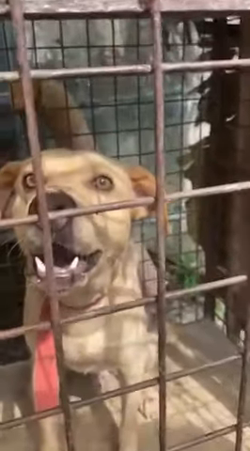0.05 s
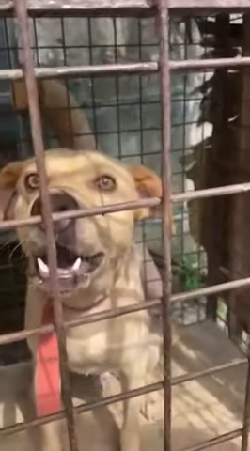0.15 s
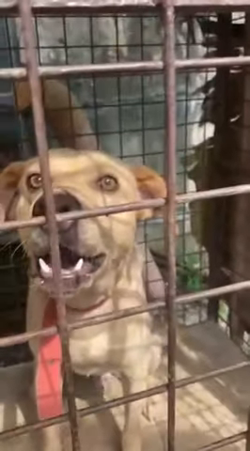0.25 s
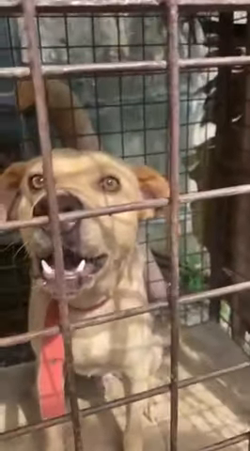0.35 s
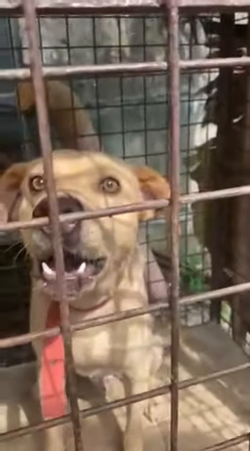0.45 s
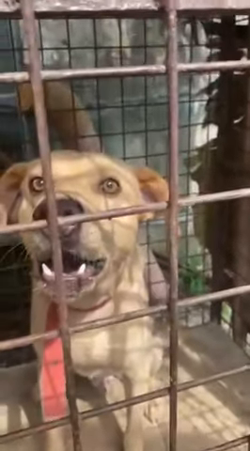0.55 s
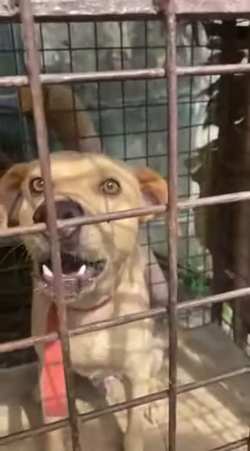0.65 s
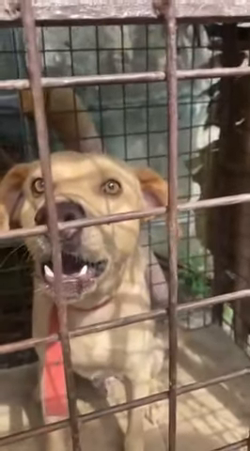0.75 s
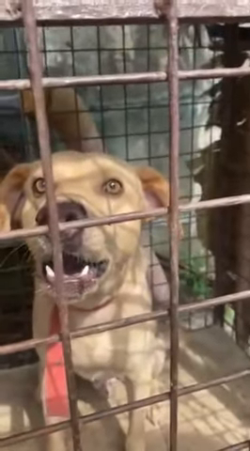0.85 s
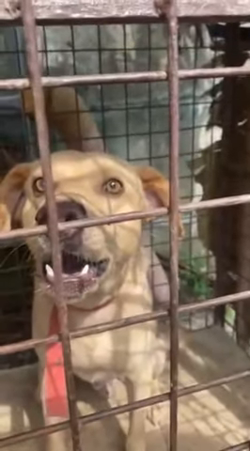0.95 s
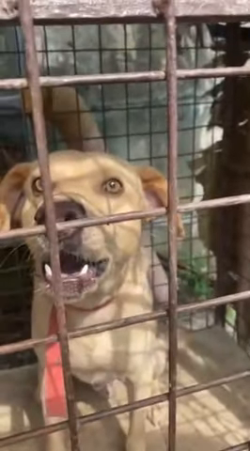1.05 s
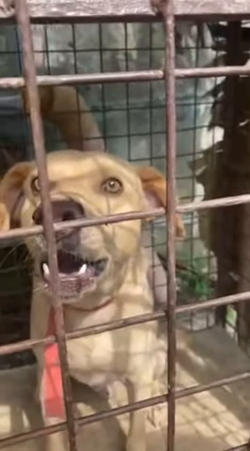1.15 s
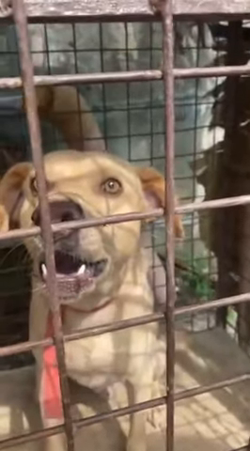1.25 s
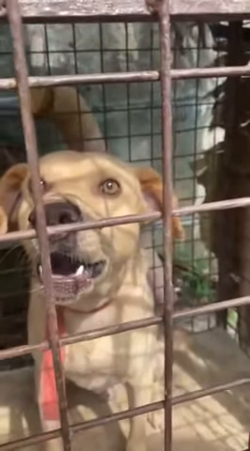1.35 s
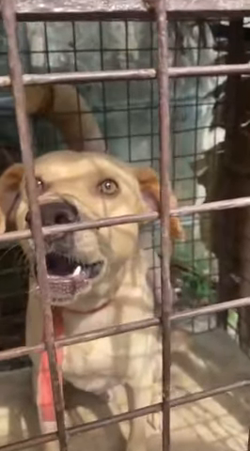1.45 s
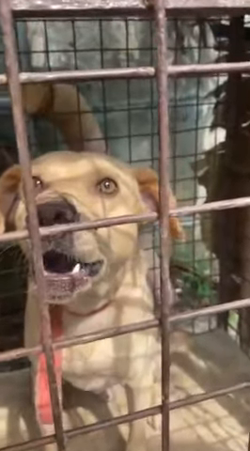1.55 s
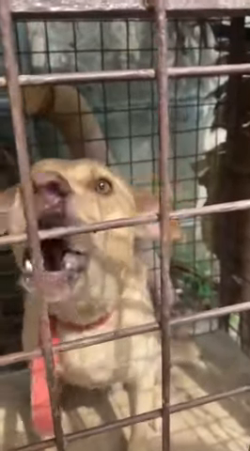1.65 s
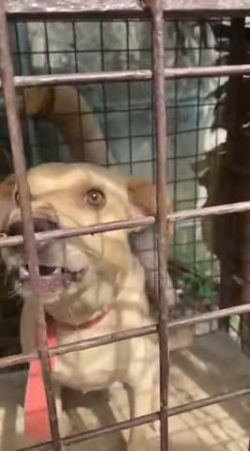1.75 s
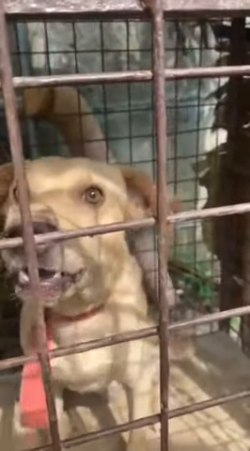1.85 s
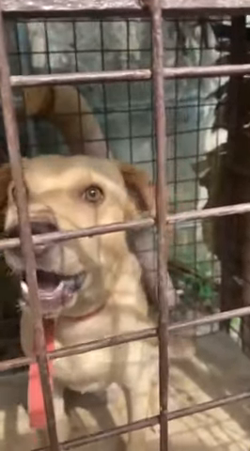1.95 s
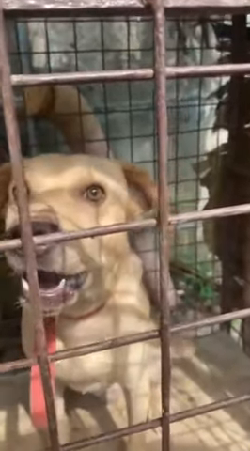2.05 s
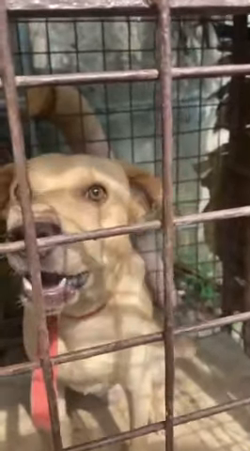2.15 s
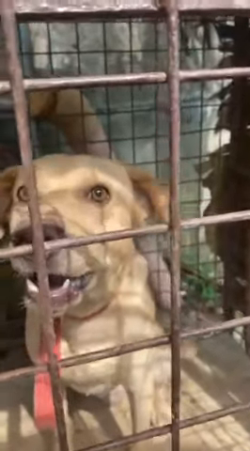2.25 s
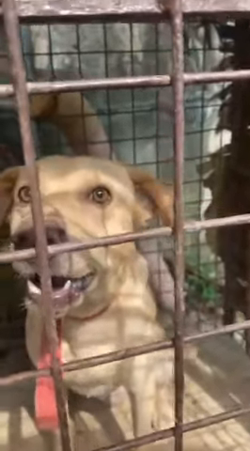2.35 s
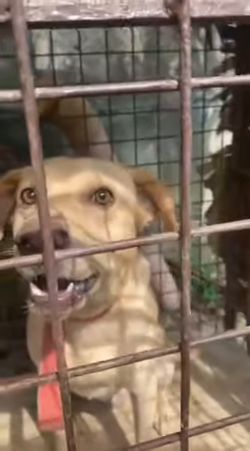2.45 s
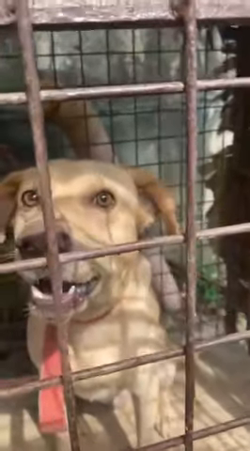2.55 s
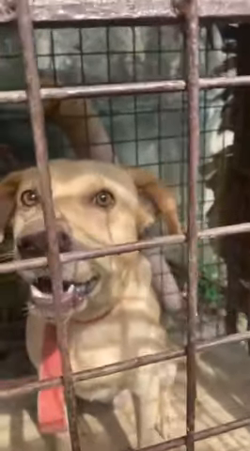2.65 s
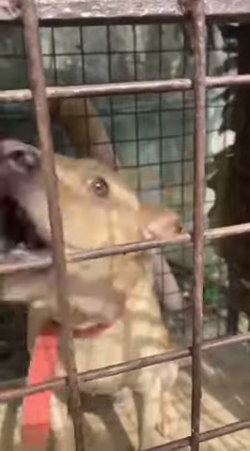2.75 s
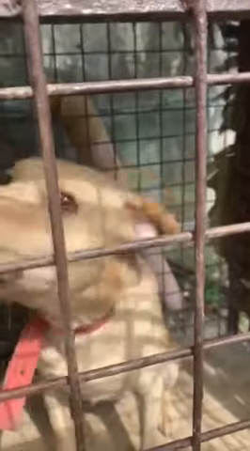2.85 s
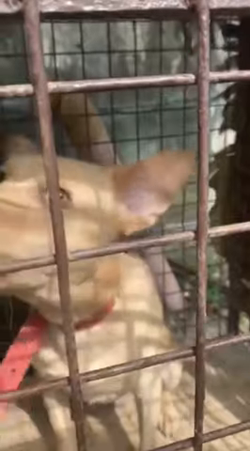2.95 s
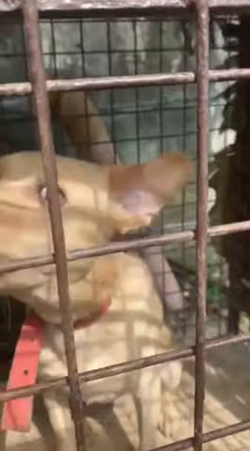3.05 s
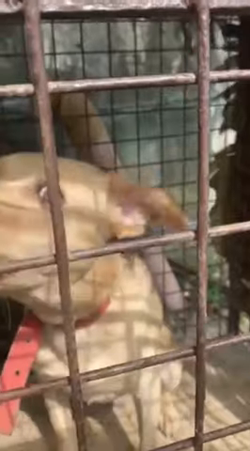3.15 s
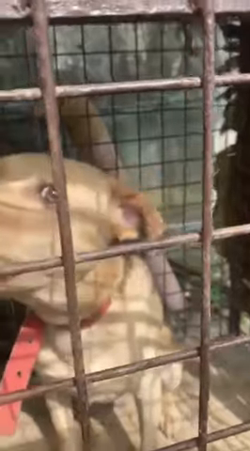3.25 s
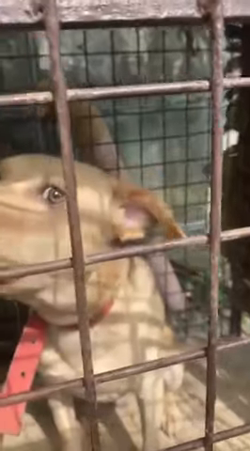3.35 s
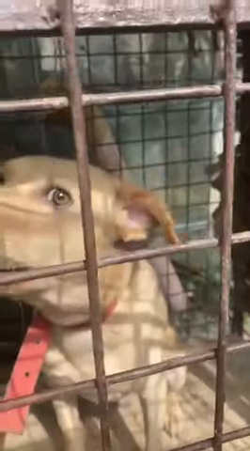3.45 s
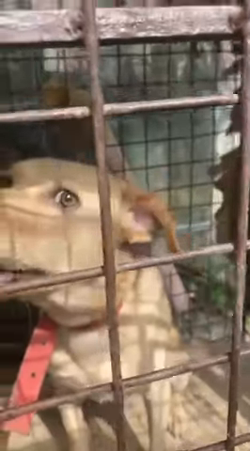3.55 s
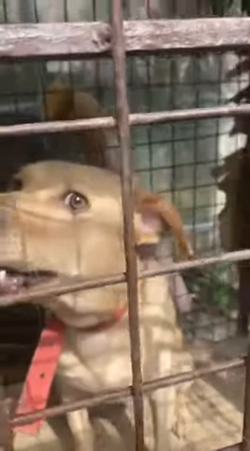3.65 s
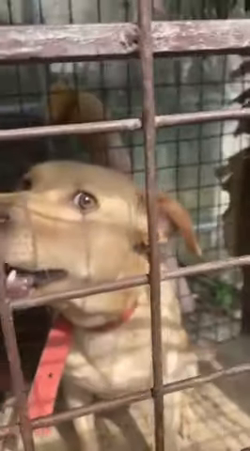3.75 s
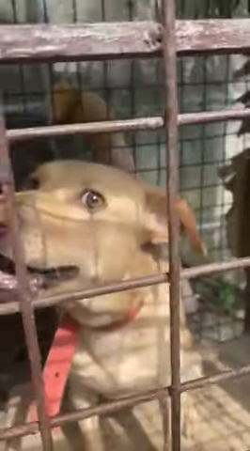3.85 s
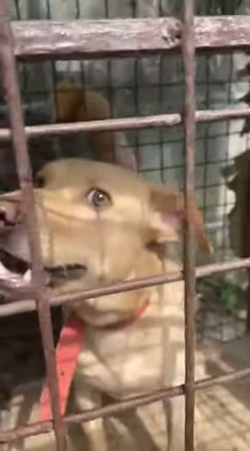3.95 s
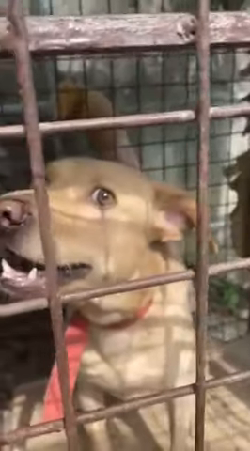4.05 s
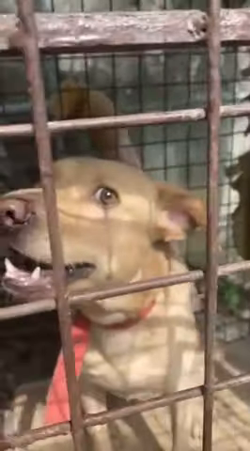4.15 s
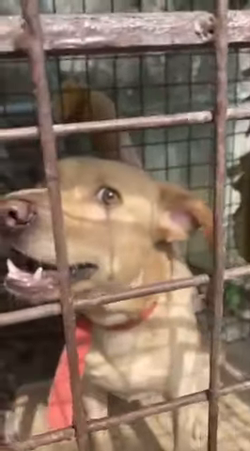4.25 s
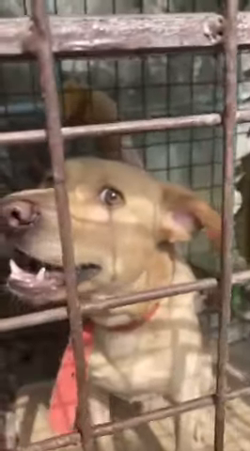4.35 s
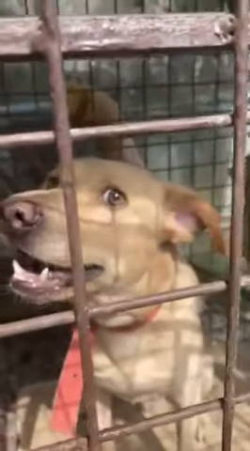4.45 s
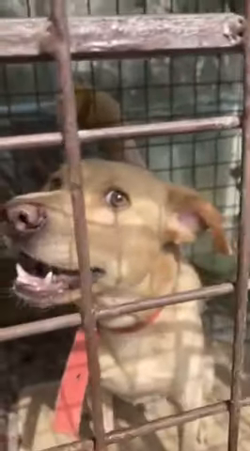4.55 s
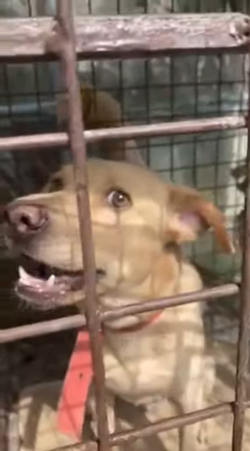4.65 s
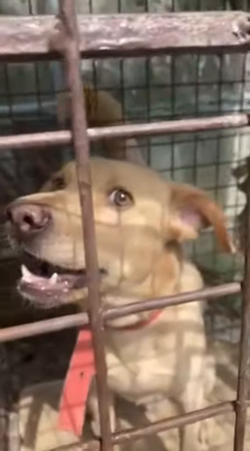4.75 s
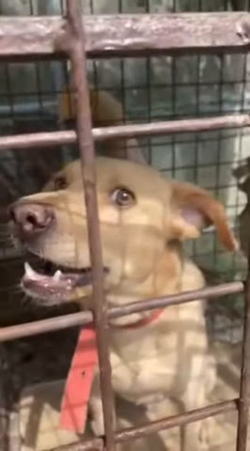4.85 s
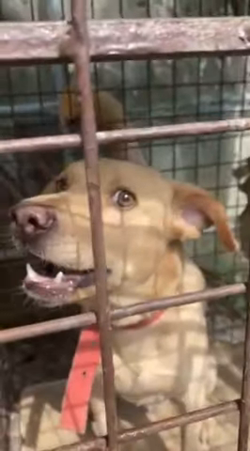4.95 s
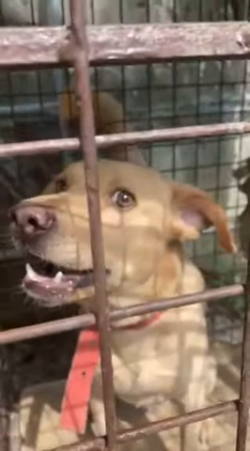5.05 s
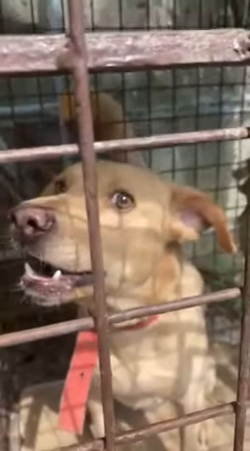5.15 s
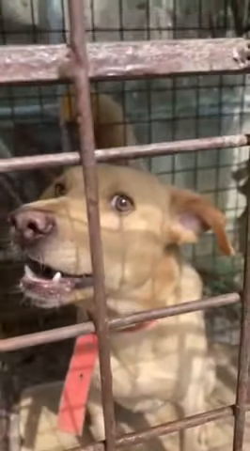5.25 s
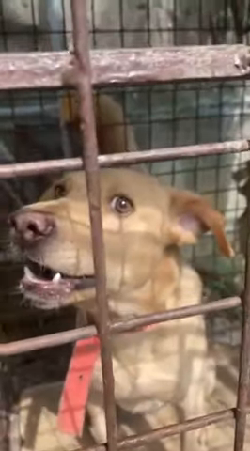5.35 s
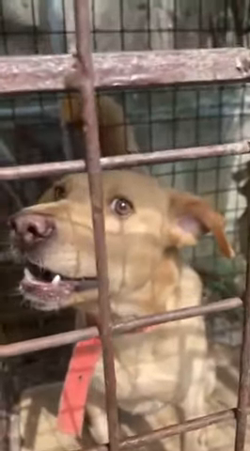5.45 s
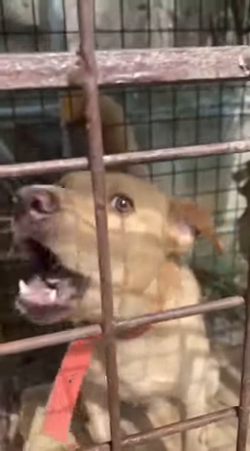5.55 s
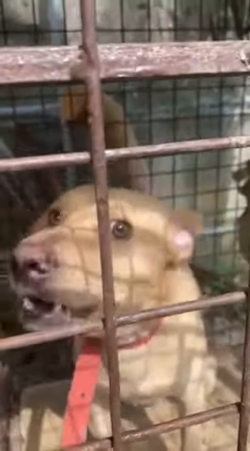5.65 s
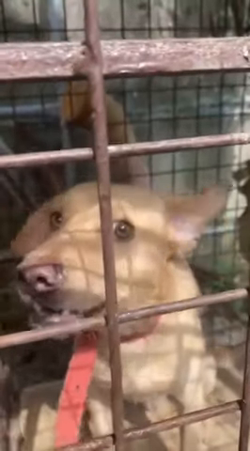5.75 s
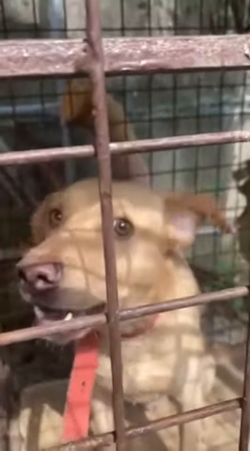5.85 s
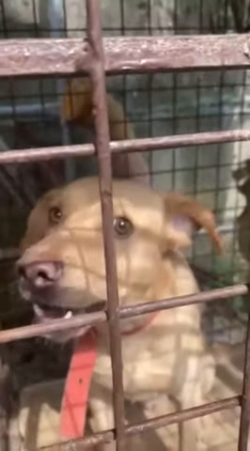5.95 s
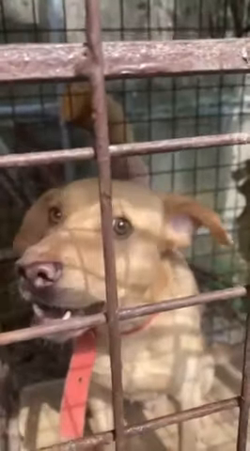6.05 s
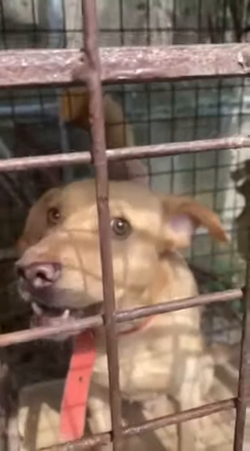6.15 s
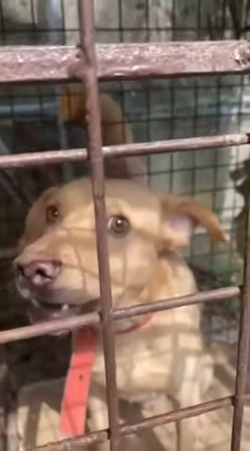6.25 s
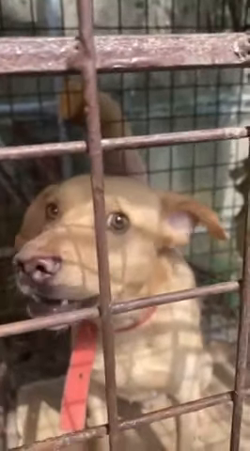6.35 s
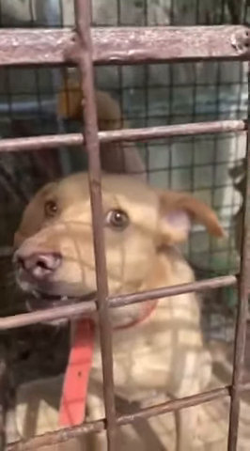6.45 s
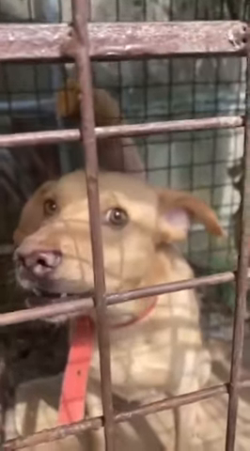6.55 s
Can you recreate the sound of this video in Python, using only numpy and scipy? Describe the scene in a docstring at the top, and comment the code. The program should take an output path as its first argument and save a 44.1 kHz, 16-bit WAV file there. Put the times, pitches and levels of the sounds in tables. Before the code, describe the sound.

Close phone pickup of a threatening dog: pulsing, gravelly growls through a nearly shut mouth, with small dry clicks and breathy hiss past the teeth. Three brief, explosive barks stand far above the growls, each yelping upward at its start and dying in a raspy tail. After the second bark a smoother low moan trails off. Faint outdoor rumble and a slight hard cage reflection surround it.

```python
"""A caged dog close to a phone growls in long breaths and barks three times.
Growl: uneven slow pulses of the vocal folds and puffs of air ring a nearly shut mouth, over a chest hum.
Bark: a high tone under a rough burst whose resonance sweeps up as the jaw drops, then a closing tone.
Single fold slaps click in the growl; air rasps as a bark dies. The cage reflects; outdoors rumbles faintly."""
import sys
import numpy as np
from scipy import signal
from scipy.fft import rfft, irfft, next_fast_len
from scipy.io import wavfile
from scipy.ndimage import uniform_filter1d, minimum_filter1d

SR = 44100
rng = np.random.default_rng(int(sys.argv[2]) if len(sys.argv) > 2 else 0)


def generate_wav(sig):
    """Save sig (samples, or channels by samples) to the path in sys.argv[1] as 16-bit PCM at SR."""
    pcm = np.round(np.clip(np.atleast_2d(sig).T, -1, 1) * 32767).astype(np.int16)
    wavfile.write(sys.argv[1], SR, pcm)


def gain_from_db(level_db):
    """Convert decibel levels to linear amplitude factors (20 dB per decade)."""
    decades = np.asarray(level_db, float) / 20
    return 10 ** decades


N = 291242  # length in samples

# outdoor rumble: frequency_hz, density_db
RUMBLE = [(12, -33), (25, -27.5), (50, -18.5), (85, 2), (125, -10), (165, 0), (250, -18), (400, -14.5),
          (750, -26.5), (1000, -21.5), (2400, -26), (3500, -42.5), (8000, -44), (12000, -64), (22000, -120)]
RUMBLE_DB = -63  # rms of the rumble
# deepest rumble, which comes and goes: time_s, level_db
DEEP_LEVEL = [(0.0, -65.5), (1.29, -67), (1.45, -92), (1.58, -52), (1.62, -59), (3.232, -67.5),
              (3.511, -77), (4.74, -76.5), (4.87, -59), (4.94, -72), (5.06, -58), (5.2, -67.5), (6.17, -61),
              (6.6, -77.5)]
# its band: low_edge_hz, high_edge_hz
DEEP_BAND = [35.2, 81.4]

# share sent back by the cage: frequency_hz, gain_db
CAGE_ECHO = [(100, -44), (300, -36.5), (600, -12), (1200, -16.5), (1800, -37.5), (2500, -4), (5000, 0),
             (11000, -6.5)]
# phase between the two microphone ports: frequency_hz, left_lead_radians
PORT_LEAD = [(0, 0), (2150, 0.0), (2500, 0.5), (3620, 0.1), (3960, 2.6), (4220, 2.6), (4820, 3.1),
             (5250, 5.8), (5510, 6.4), (6720, 6.4), (8180, 7.9), (8530, 8.6), (9220, 9.1), (11700, 9.5)]
# level between the ports: frequency_hz, left_over_right_db
PORT_TILT = [(60, 0), (130, 0), (270, -1.4), (570, -1.1), (1210, -.5), (2570, -.3), (5460, -.4),
             (11600, .2)]
CEILING, HOLD_S = 0.9, 0.0049  # limiter of the phone: full scale is 1; hold to each side of a peak

# air rasping high in the throat as a bark dies: start_s, length_s, level_db, from_hz, to_hz
RASPS = [(1.67, 0.0643, -49, 2657, 2990), (2.78, 0.024, -45, 2760, 2900), (5.64, .09, -51, 2760, 3500)]
# hardest single slaps of the folds in a growl: start_s, level_db
SLAPS = [(0.662, -26.5), (0.841, -23), (0.885, -28), (1.068, -21.5), (1.17, -26.5), (1.313, -27.5),
         (1.445, -25), (1.477, -29), (1.765, -31.5), (1.789, -39), (1.965, -26), (1.998, -27.5),
         (2.188, -34), (2.327, -26.5), (4.606, -41), (4.857, -39), (4.881, -37), (4.95, -35.5),
         (5.855, -36.5), (5.938, -36), (6.009, -27.5)]
STICK_S, STICK = 0.0044, 0.7  # the folds cling this long before a slap; share of the voice held back

# course of each bark: time_s, burst_db, yelp_db, closing_tone_db, slow_tone_hz, jaw_resonance_hz
BARKS = [
    [(1.553, -50.5, -52, -79, 514.3, 470), (1.562, -24, -41, -58.5, 514.7, 500),
     (1.571, -30.5, -8.5, -63, 498.3, 503), (1.576, -21, -7, -48, 541.3, 530),
     (1.582, -19, -8.5, -40.5, 551.5, 555), (1.587, -12.5, -11.5, -36.5, 565.6, 590),
     (1.592, -11.5, -25, -21, 562.5, 800), (1.6, -13, -14.5, -31.5, 584.2, 885),
     (1.607, -12.5, -29, -21, 587.5, 870), (1.616, -14, -20, -18, 581, 885),
     (1.626, -13, -15.5, -29, 596.7, 1030), (1.636, -9.5, -18.5, -14.5, 575.6, 965),
     (1.646, -16, -14, -21.5, 560, 972), (1.657, -19.5, -34.5, -7, 581, 960),
     (1.662, -16, -37, -10, 552, 930), (1.667, -22.5, -44, -26.5, 512, 900),
     (1.678, -22, -47, -10, 524, 850), (1.685, -28, -53, -22.5, 507, 850),
     (1.691, -31.5, -53, -33, 510, 880), (1.697, -37, -65, -17.5, 527, 900),
     (1.706, -45.5, -57.5, -28, 437, 900), (1.72, -52, -61, -42, 439, 950),
     (1.745, -74, -70, -72, 478, 750)],
    [(2.665, -56, -61, -67, 511, 520), (2.676, -36, -34, -72.5, 500, 540),
     (2.685, -33, -28, -63.5, 520, 495), (2.69, -28, -12, -59.5, 518, 508),
     (2.695, -26, -6.5, -55, 540, 545), (2.7, -25, -4.5, -45, 570, 572), (2.706, -23, -7, -40, 592, 596),
     (2.71, -21, -22.5, -13, 590, 770), (2.716, -13.5, -17, -21.5, 581.4, 860),
     (2.721, -13.5, -17.5, -32, 599.5, 920), (2.73, -11, -22, -21.5, 590.4, 880),
     (2.74, -8.5, -21, -31, 595.4, 1050), (2.752, -11.5, -18, -26, 598.5, 1130),
     (2.76, -12, -21.5, -17, 599.7, 950), (2.77, -17, -18, -15.5, 581.7, 1030),
     (2.783, -18, -25, -18.5, 544.2, 965), (2.8, -18.5, -33, -15.5, 548, 950),
     (2.813, -26.5, -52.5, -22, 583, 850), (2.822, -35, -48, -23, 461, 800),
     (2.836, -47, -57, -33.5, 493, 900), (2.865, -77.5, -73, -47, 501.7, 780)],
    [(5.49, -55, -61, -64.5, 518, 520), (5.498, -35, -38, -68.5, 502.4, 545),
     (5.507, -30, -31.5, -61.5, 519.2, 500), (5.513, -30.5, -12, -56, 543.6, 490),
     (5.519, -23, -20.5, -55, 540.7, 525), (5.525, -21, -11.5, -44.5, 560, 665),
     (5.531, -17.5, -23, -30, 560, 725), (5.538, -8, -28.5, -36, 563, 860),
     (5.546, -10.5, -17, -30.5, 575.2, 900), (5.56, -14.5, -22.5, -25, 584.2, 965),
     (5.568, -9, -20.5, -16, 563, 1000), (5.576, -10.5, -22.5, -12, 579.4, 990),
     (5.59, -14, -27, -17, 560.5, 970), (5.603, -19, -32, -12, 570.7, 1000),
     (5.615, -25, -43.5, -10, 516.5, 1020), (5.624, -35, -47.5, -15, 478, 1000),
     (5.635, -34.5, -42.5, -16, 520.5, 900), (5.648, -45, -56, -31, 458.4, 900),
     (5.66, -50.5, -64, -40, 500, 900), (5.678, -71.5, -80, -55, 490, 800)],
]
# how torn each bark is: raggedness (0-1)
RAGGED = [.95, .9, .8]
# throat in a bark, centred for a jaw resonance of 1000 Hz: centre_hz, width_hz, level_db
OPEN_THROAT = [(1250, 780, -2), (1720, 470, -10), (2140, 1200, -21), (2620, 200, -19.5), (3270, 900, -23.5)]
# air past the teeth in a bark: frequency_hz, density_db
BARK_HISS = [(2180, -38), (3700, -28.5), (4250, 2), (4930, -23.5), (5020, -16), (5560, -3.5), (7330, -1.5),
             (10900, -12), (11400, -14), (11600, -58.5), (15100, -99), (22000, -120)]
BARK_AIR_DB, AIR_SLOPE = -32, 0.74  # hiss under the burst, and how closely it follows (dB per dB)
# second to fourth partial of the yelp against the first: level_db
YELP_OVERTONES = [-13, -24, -26]
# second to fifth partial of the closing tone against the first: level_db
CLOSING_OVERTONES = [-15, -19, -31, -32]
HALF = 0.5  # depth at which every second slow beat chops the yelp
EDGE_HZ = 3240  # burst and tones carry almost nothing just above this

# stretches of growling: time_s, first_resonance_db, upper_throat_db, chest_hum_db
GROWLS = [
    [(0.0, -71, -68.5, -64.5), (0.046, -65, -76, -60), (0.142, -64.5, -74, -66), (0.202, -56, -67.5, -58),
     (0.222, -59, -70.5, -55), (0.246, -48, -68, -68), (0.268, -58, -61.5, -62), (0.282, -58, -95, -75.5),
     (0.312, -87.5, -90.5, -75), (0.358, -62, -68, -86.5), (0.392, -56, -67, -62), (0.422, -59, -74, -81),
     (0.46, -66, -83.5, -79.5)],
    [(0.46, -65, -69.5, -71), (0.5, -51, -53, -86), (0.524, -46, -51, -54), (0.554, -32.5, -42.5, -53.5),
     (0.618, -30, -43, -42.5), (0.86, -39.5, -45.5, -47), (0.89, -33, -43.5, -48), (0.944, -42, -51, -49),
     (0.97, -39, -46, -50.5), (1.404, -40.5, -49.5, -49.5), (1.494, -40, -48.5, -48.5),
     (1.528, -58, -81.5, -68), (1.54, -45, -54, -49.5), (1.558, -37.5, -49.5, -56.5)],
    [(1.885, -53, -52.5, -60), (1.901, -48, -57, -47.5), (1.975, -36, -39.5, -41.5), (2.005, -35, -44, -43),
     (2.219, -37.5, -47.5, -41.5), (2.235, -43, -48, -49.5), (2.345, -37, -49, -42.5),
     (2.495, -40, -50, -54.5), (2.525, -34.5, -43, -39), (2.579, -46.5, -53, -44.5),
     (2.625, -38.5, -56, -45.5), (2.653, -66.5, -77, -60), (2.66, -59, -74.5, -52.5)],
    [(2.835, -30, -52, -50), (2.853, -40, -52, -50), (2.866, -34, -56, -50), (2.885, -40, -58, -51),
     (2.909, -45, -57, -54), (2.937, -45, -56, -54), (2.977, -42, -53, -51.5), (3.031, -52, -56.5, -52),
     (3.195, -46.5, -56.5, -56), (3.427, -54.5, -60, -57), (3.633, -59, -64, -54),
     (3.753, -69.5, -74, -57.5), (3.79, -72.5, -70.5, -61.5)],
    [(4.48, -84, -77, -81.5), (4.495, -56, -58.5, -62.5), (4.6, -49, -60, -81.5), (4.634, -33.5, -43, -56),
     (4.72, -33, -43.5, -40), (4.816, -51.5, -50, -54.5), (4.868, -46, -55.5, -42.5),
     (4.9, -46.5, -54.5, -58.5), (4.972, -42.5, -49.5, -47.5), (5.13, -57, -61.5, -53.5),
     (5.456, -43, -53.5, -51.5), (5.48, -62.5, -65, -70.5), (5.487, -27, -53, -58)],
    [(5.8, -54.5, -73, -72), (5.82, -67, -60, -50), (5.846, -43, -57.5, -51.5),
     (5.864, -46.5, -46.5, -46.5), (6.05, -39, -47, -47.5), (6.09, -40.5, -50.5, -44),
     (6.204, -63.5, -58.5, -53), (6.238, -62, -64, -54.5), (6.288, -47, -60, -52.5),
     (6.402, -57.5, -64.5, -51.5), (6.474, -66, -71, -54.5), (6.552, -57, -58, -58), (6.6, -80.5, -79, -68)],
    [(1.705, -29, -41.5, -65), (1.729, -42.5, -55.5, -71), (1.741, -43.5, -49.5, -63),
     (1.801, -42, -50.5, -52.5), (1.849, -65, -77.5, -63.5), (1.87, -54, -80.5, -73)],
    [(5.655, -31.5, -40, -71), (5.699, -53, -47, -52), (5.749, -42.5, -59.5, -62.5),
     (5.765, -54.5, -60.5, -74.5), (5.779, -66, -89.5, -76.5), (5.8, -57, -80.5, -75.5)],
    [(3.79, -72, -68, -62), (3.846, -58, -63.5, -55.5), (3.93, -56, -60, -54.5), (4.1, -61.5, -65, -55.5),
     (4.26, -65.5, -69.5, -58), (4.32, -75, -70.5, -69), (4.41, -81, -83.5, -63), (4.47, -91, -97, -72)],
]
# pulse rate of the growling folds: time_s, pitch_hz
PITCH = [(0.0, 85.23), (.12, 84.75), (.19, 78.39), (.28, 73.17), (.42, 84.03), (0.5, 164.8), (0.57, 151.2),
         (0.68, 150), (0.8, 157.8), (0.88, 163.1), (0.93, 122), (1.89, 112.3), (1.97, 142.9), (2.19, 133.6),
         (2.35, 145.3), (2.6, 131.8), (2.8, 304), (2.85, 280.2), (2.9, 227.4), (2.945, 192.4),
         (3.02, 183.7), (3.08, 162.6), (3.1, 118.4), (3.31, 116.4), (3.36, 114.4), (3.51, 110.1),
         (3.64, 102.4), (3.78, 88.55), (3.81, 95.24), (3.86, 106), (3.9, 102.8), (3.97, 112.6),
         (4.05, 97.96), (4.09, 94.3), (4.14, 100.9), (4.2, 94), (4.3, 89.05), (4.41, 82.6), (4.5, 92.61),
         (4.63, 158.5), (4.93, 140.5), (5.3, 136.7), (5.46, 115.6), (6.09, 133.7), (6.3, 114.2),
         (6.4, 90.5), (6.48, 83.1), (6.53, 128.7), (6.6, 130.9)]
# how unevenly the folds beat: time_s, roughness (0-1)
ROUGH = [(0, .2), (.15, .2), (.22, .3), (.3, .35), (.52, .5), (.57, .1), (.74, .1), (.78, .25), (.86, .3),
         (.92, .7), (1.95, .8), (2.02, .48), (2.15, .55), (2.22, .8), (2.8, .8), (2.86, .15), (3.05, .25),
         (3.15, .4), (3.35, .28), (3.48, .05), (4.42, .05), (4.5, .7), (4.65, .38), (4.78, .42),
         (4.85, .75), (6.35, .75), (6.42, .15), (6.52, .2), (6.6, .6)]
# loose tissue flaps and chops the growl: time_s, depth_db
RATTLE = [(0, 1), (.8, 2.5), (.95, 1), (2.6, 1), (2.88, 3), (3.35, 3.5), (3.5, 1), (4.4, 1), (4.85, 1.5),
          (6.6, 3)]
# first resonance as the lips move: time_s, centre_hz
MOUTH = [(0, 560), (.25, 710), (.5, 597), (.72, 562), (.95, 579.6), (1.45, 595), (1.8, 642), (2.0, 638),
         (2.22, 549.4), (2.6, 582.4), (2.86, 560), (2.92, 465), (3.7, 510), (3.82, 690), (4.25, 724),
         (4.65, 780), (4.99, 640), (5.7, 556.5), (5.86, 656), (6.16, 525), (6.6, 473)]
REST_HZ = 560  # first resonance with the lips at rest
# throat in a growl: centre_hz, width_hz, level_db
UPPER = [(1240, 530, -12.5), (1434, 140, -4), (1785, 540, -30.5), (2377, 300, -6), (2440, 130, -8.5),
         (3120, 440, -12), (4010, 250, -14), (1500, 71, -14.5)]
# shift of each upper resonance per Hz of the first: shift_hz_per_hz
FOLLOW = [0.252, 0.8, 0.083, 0.175, 0.78, 0.19, 0.089, 0.76]
SECOND_DB, HIGHER_DB = 0, -3.5  # how the two groups of upper resonances share their level
# soft moan through the nose: time_s, nasal_share (0-1)
NASAL = [(2.7, 0), (2.9, 1), (4.4, 0.92), (4.6, 0.25), (4.9, 0.47)]
# what the nose does to each upper resonance: change_db
NASAL_CHANGE = [-3, -10, 17, 2, -4, -6, -7, 0]
# its effect on the second group (dB), the sinking of a low resonance and the broadening of the upper ones
NASAL_SECOND_DB, NASAL_DROP, NASAL_WIDEN = -2.5, 0.13, 0.2
# jaw still open for a moment after a bark: time_s, open_share (0-1)
JAW = [(1.5, 0), (1.6, 0.83), (1.8, 0.6), (1.88, 0.23), (2.7, 0), (2.8, .6), (2.9, .4), (3.0, 0),
       (5.5, 0.11), (5.6, 1), (5.76, 0.9), (5.82, 0.27)]
# throat then: centre_hz, width_hz, level_db
AJAR = [(1150, 400, -1.5), (1680, 180, 4), (2300, 450, 0), (2950, 500, -8.5), (3550, 400, -15)]
# side pockets of the mouth swallow narrow bands: centre_hz, width_hz, gain_db
POCKETS = [(900, 75, -5), (1920, 260, -6)]
# air past the teeth in a growl: frequency_hz, density_db
GROWL_HISS = [(2880, -35.5), (4900, 6), (5150, -3.5), (6440, -6.5), (6930, -8), (7360, -6.5), (8630, -7),
              (9080, -5), (11600, -19), (15100, -56.5), (22000, -120)]
# hiss over the upper throat; the soft moan carries little air: time_s, level_db
AIR = [(0, -13), (.4, -11.5), (1.5, -8.5), (2.6, -7.5), (2.9, -21), (4.4, -19), (4.55, -9), (6.6, -9.5)]
# how much of the chest hum is a clear tone: time_s, clear_share (0-1)
CLEAR = [(0, .9), (.22, .9), (.3, .5), (.5, .5), (.54, .92), (.8, .9), (.88, .75), (.94, .3), (1.95, .2),
         (2.02, .65), (2.15, .55), (2.22, .25), (2.5, .25), (2.55, .6), (2.65, .3), (2.84, .95), (3.05, .9),
         (3.12, .7), (3.3, .85), (3.48, .97), (4.42, .97), (4.5, .3), (4.65, .85), (4.78, .8), (4.85, .25),
         (6.33, .25), (6.42, .9), (6.48, .9), (6.52, .3), (6.6, .3)]
# second partial of the chest hum against the first: time_s, level_db
OCTAVE = [(0, 1), (.3, 7), (.45, -17), (.6, -6.5), (2.8, -1.5), (3.2, -13.5), (3.75, -14.5), (4.1, -15.5),
          (4.4, 0), (4.6, -3), (6.6, -8.5)]


def evened(x):
    """Scales x to rms 1."""
    return x / np.sqrt(np.mean(x ** 2) + 1e-20)


def steady(x, width=2200):
    """Evens the slow level of x to 1, over width samples."""
    return x / np.sqrt(abs(uniform_filter1d(x ** 2, int(width))) + 1e-12)


def curve(points, at):
    """Straight lines through the points of a table."""
    return np.interp(at, *np.transpose(points))


def read(points, hz):
    """Reads a table on a logarithmic frequency axis."""
    f, value = np.transpose(points)
    return np.interp(np.log(hz + 1), np.log(f + 1), value)


def coloured(x, gain):
    """Filters by a gain that is a function of frequency."""
    size = next_fast_len(x.shape[-1])
    spectrum = rfft(x, size) * gain(np.fft.rfftfreq(size, 1 / SR))
    return irfft(spectrum, size)[..., :x.shape[-1]]


def band(x, order, edges_hz, kind):
    """A steep causal filter."""
    return signal.sosfilt(signal.butter(order, edges_hz, kind, fs=SR, output="sos"), x)


def resonate(x, hz, width):
    """Shifts the curve hz down to zero, smooths, and shifts back: a resonance of gain 1."""
    turn = np.exp(2j * np.pi * np.cumsum(hz * np.ones(len(x))) / SR)
    r = np.exp(-np.pi * width / SR)
    return 2 * (turn * signal.lfilter([1 - r], [1, -r], x / turn)).real


def wobble(count, hz):
    """Slow chance of rms 1 that changes about hz times a second."""
    return evened(resonate(resonate(rng.standard_normal(count), 0, hz), 0, hz))


def throat_ring(x, hz, width):
    """A steep resonance of soft tissue that never holds still."""
    hz = hz * (1 + 0.013 * wobble(len(x), 12))
    return resonate(resonate(x, hz, width), hz, 2 * width)


def voiced(hz, overtones_db):
    """A tone on the curve hz with a few overtones; the lowest partial has rms 1."""
    turn = 2 * np.pi * np.cumsum(hz) / SR
    return np.sqrt(2) * sum(gain_from_db(db) * np.sin((k + 1) * turn) for k, db in enumerate([0] + overtones_db))


def folds(hz, rough, jitter, shimmer_db):
    """One pulse a cycle, late or early and strong or weak by chance; returns pulses and airflow gate."""
    turns = np.cumsum(hz * np.exp(jitter * rough * wobble(len(hz), hz.mean()))) / SR
    cycle = turns.astype(int)
    size = gain_from_db(shimmer_db * rough * rng.standard_normal(len(hz))[cycle])
    phase = turns - cycle
    pulses = np.diff(size * phase ** 2, prepend=0)  # flow swells, then shuts at once
    gate = size * (0.25 + np.exp(-phase / 0.3))
    return pulses, gate


def hiss(gate, colour):
    """Air past the teeth, puffed by the folds."""
    puffed = gate * rng.standard_normal(len(gate))
    return steady(coloured(puffed, lambda hz: gain_from_db(read(colour, hz))))


def deep():
    """Noise at the very bottom, the same at both ports."""
    low = band(rng.standard_normal(N), order=2, edges_hz=DEEP_BAND, kind="band")
    return gain_from_db(curve(DEEP_LEVEL, np.arange(N) / SR)) * evened(low)


def rumble():
    """Lumpy low outdoor noise, nearly alike at both ports."""
    near, apart = rng.standard_normal((2, N)) * gain_from_db(0.83 * wobble(N, 2.1))
    both = np.array([near + 0.06 * apart, near - 0.06 * apart])
    return gain_from_db(RUMBLE_DB) * evened(coloured(both, lambda hz: gain_from_db(read(RUMBLE, hz))))


def cage(x, t60=0.16):
    """Sparse reflections of random sign from bars, floor and walls, other ones at each port."""
    taps = np.zeros((2, SR // 2))
    at = np.arange(60, SR // 2 - 22, 22)
    at = at + rng.integers(0, 22, (2, len(at)))  # one reflection somewhere in every 22 samples
    bounce = rng.choice([-1., 1.], at.shape) * gain_from_db(-60 * at / SR / t60)
    np.put_along_axis(taps, at, bounce, 1)
    return signal.fftconvolve(x[None], taps / np.linalg.norm(taps[0]), axes=1)[:, :N]


def rasp(s, length, db, from_hz, to_hz):
    """Fluttering noise in one resonance that climbs."""
    hz = np.linspace(from_hz, to_hz, int(length * SR))
    air = rng.standard_normal(len(hz)) * gain_from_db(3.0 * wobble(len(hz), 90))
    ring = resonate(resonate(air, hz, 450), hz, 700)
    return s, gain_from_db(db) * evened(ring) * np.hanning(len(hz))


def slap(s, db):
    """One click rings the first resonance and the upper throat for a few milliseconds."""
    t = np.arange(SR // 30) / SR
    first = np.sin(2 * np.pi * curve(MOUTH, s) * t) * np.exp(-t / 0.0041) * (1 - np.exp(-t / 0.00055))
    upper = sum(gain_from_db(level) * np.sin(2 * np.pi * f * t) * np.exp(-np.pi * w * t) for f, w, level in UPPER)
    return s, gain_from_db(db) * (first + 0.3 * upper)


def bark_burst(slow, fast, gate, mouth_hz):
    """Both vibrations and torn air ring the jaw and throat; the loudest swings of air saturate."""
    air = gate * rng.standard_normal(len(gate))
    drive = evened(fast) + 0.8 * evened(slow) + 0.5 * evened(air)
    throat = resonate(resonate(drive, mouth_hz, 540), mouth_hz, 890)
    spread = (mouth_hz / 1000) ** 0.4  # the upper throat follows the jaw a little
    for f, w, db in OPEN_THROAT:
        throat = throat + gain_from_db(db) * resonate(resonate(drive, f * spread, w), f * spread, 2.5 * w)
    throat = np.tanh(0.45 * steady(throat, 900))
    return steady(band(throat, order=3, edges_hz=330, kind="high"), 1500)


def bark(rows, ragged):
    """Two vibrations at once: a wavering low tone, and a ragged faster one that glides up as the jaw drops."""
    s, *columns = np.transpose(rows)
    t = np.arange(s[0], s[-1], 1 / SR)
    burst_db, yelp_db, closing_db, hz, mouth_hz = (np.interp(t, s, c) for c in columns)
    slow, gate = folds(hz, ragged, jitter=0.045, shimmer_db=4)
    fast, _ = folds(mouth_hz, 0.5 + 0.5 * ragged, jitter=0.045, shimmer_db=6)
    burst = bark_burst(slow, fast, gate, mouth_hz)

    # both tones break up once the fast vibration leaves the slow one
    clash = ragged * np.clip((mouth_hz / hz - 1.2) / 0.5, 0.05, 1)
    closing = voiced(hz * (1 + 0.024 * clash * wobble(len(t), 120)), CLOSING_OVERTONES)
    closing = closing * gain_from_db(2.8 * clash * wobble(len(t), 70))
    yelp = voiced(mouth_hz * (1 + (0.006 + 0.03 * clash) * wobble(len(t), 100)), YELP_OVERTONES)
    yelp = yelp * gain_from_db(2.5 * clash * wobble(len(t), 110))
    yelp = yelp * (1 + HALF * clash * np.sin(np.pi * np.cumsum(hz) / SR))  # at half the slow rate

    voice = gain_from_db(yelp_db) * yelp + gain_from_db(closing_db) * closing
    voice = voice + gain_from_db(burst_db + 0.82 * wobble(len(t), 80)) * burst
    for _ in range(2):
        voice = band(voice, order=14, edges_hz=EDGE_HZ, kind="low")
    voice = voice + gain_from_db(BARK_AIR_DB + AIR_SLOPE * burst_db) * hiss(gate, BARK_HISS)
    voice = band(voice, order=4, edges_hz=160, kind="high")  # a small head radiates no bass
    return s[0], voice * signal.windows.tukey(len(t), 0.05)


def chest_hum(low, t):
    """The chest hums the two lowest partials, between a clear tone and a rough resonance."""
    clear = curve(CLEAR, t)
    turns = np.cumsum(curve(PITCH, t) * (1 + 0.1 * (1 - clear) * wobble(len(t), 40))) / SR
    tone = np.sin(2 * np.pi * turns) + gain_from_db(curve(OCTAVE, t)) * np.sin(4 * np.pi * turns)
    tone = tone * gain_from_db(1.5 * wobble(len(t), 19))
    rough = resonate(resonate(low, 210, 240), 130, 390)
    rough = rough + 0.38 * resonate(resonate(low, 145, 77), 145, 140)
    chest = clear * tone + (1 - clear) * steady(rough)
    return steady(band(chest, order=4, edges_hz=65, kind="high"), 4000)


def first_resonance(low, first_hz, nasal):
    """A split resonance of the mouth: the moving centre leans on the lower or the upper of a fixed pair."""
    share = np.clip((first_hz - 500) / 220, 0, 1)
    first = 0.78 * (1 - nasal) * resonate(low, first_hz, 110)
    lower_gain = 1.1 - 0.72 * share * (1 - 0.42 * nasal)
    first = first + lower_gain * resonate(low, 580 * (1 - NASAL_DROP * nasal), 120)
    first = first + (0.34 + 2.2 * share) * resonate(low, 702.6, 53)
    first = first + 0.58 * resonate(low, 200, 170)
    first = band(first, order=5, edges_hz=582, kind="low")  # little is left just above
    return steady(band(first, order=2, edges_hz=454, kind="high"), 4800)


def upper_throat(pulses, gate, t, rough, nasal, upper_db):
    """Pulses and turbulence, new at every narrowing, ring the upper throat; an open jaw changes its shape."""
    airs = [steady(gate * rng.standard_normal(len(t))) for _ in UPPER]
    moved = curve(MOUTH, t) - REST_HZ
    widen = 1 + NASAL_WIDEN * nasal.mean()  # soft walls of the nose
    rings = []
    for (hz, width, db), change, step, air in zip(UPPER, NASAL_CHANGE, FOLLOW, airs):
        high = pulses + (0.9 - 0.35 * nasal + 1.7 * rough) * air  # turbulence rules the treble
        rings.append(gain_from_db(db + nasal * change) * throat_ring(high, hz + step * moved, width * widen))
    second = gain_from_db(SECOND_DB + nasal * NASAL_SECOND_DB) * steady(sum(rings[:3]) + rings[-1], 5300)
    higher = gain_from_db(HIGHER_DB) * steady(sum(rings[3:-1]), 5300)
    shut = gain_from_db(upper_db) * (second + higher)

    ajar = sum(gain_from_db(db) * throat_ring(air, hz, width) for (hz, width, db), air in zip(AJAR, airs))
    ajar = gain_from_db(upper_db + 1.5 * wobble(len(t), 60)) * steady(ajar, 1800)
    jaw = curve(JAW, t)
    return (1 - jaw) * shut + jaw * ajar


def growl(rows):
    """Slow pulses and puffs ring a split first resonance and the upper throat; the chest hums below."""
    s, *columns = np.transpose(rows)
    t = np.arange(s[0], s[-1], 1 / SR)
    first_db, upper_db, chest_db = (np.interp(t, s, c) for c in columns)
    rough, nasal = curve(ROUGH, t), curve(NASAL, t)

    pulses, gate = folds(curve(PITCH, t), rough, jitter=0.38, shimmer_db=-1.0)
    flap = np.sin(2 * np.pi * np.cumsum(52 * np.exp(0.36 * wobble(len(t), 30))) / SR)  # around 52 Hz
    chop = gain_from_db(curve(RATTLE, t) * flap + 2.0 * rough * wobble(len(t), 25))  # and the airflow stumbles
    pulses, gate = steady(chop * pulses), chop * gate
    puffs = steady(gate * rng.standard_normal(len(t)))
    low = pulses + 1.1 * rough * puffs

    voice = gain_from_db(first_db) * first_resonance(low, curve(MOUTH, t), nasal)
    voice = voice + upper_throat(pulses, gate, t, rough, nasal, upper_db)
    voice = voice + gain_from_db(chest_db) * chest_hum(low, t)
    voice = voice + gain_from_db(upper_db + curve(AIR, t)) * hiss(gate, GROWL_HISS)
    for hz, width, db in POCKETS:
        voice = voice - (1 - gain_from_db(db)) * (1 - nasal) * resonate(voice, hz, width)
    for at, _ in SLAPS:
        voice = voice * (1 - STICK * np.exp(-((t - at) / STICK_S + 1) ** 2))
    return s[0], voice * signal.windows.tukey(len(t), 0.015)


def scene():
    """The dog reaches the two ports with a lag that grows in the treble; reflections lack bass."""
    sounds = [growl(rows) for rows in GROWLS] + [bark(*row) for row in zip(BARKS, RAGGED)]
    sounds += [slap(*row) for row in SLAPS] + [rasp(*row) for row in RASPS]
    dog = np.zeros(N)
    for s, sound in sounds:
        part = dog[round(s * SR):][:len(sound)]
        part += sound[:len(part)]

    side = np.array([[0.5], [-0.5]])  # each port takes half the difference

    def ports(hz):
        return gain_from_db(side * read(PORT_TILT, hz)) * np.exp(1j * side * curve(PORT_LEAD, hz))

    direct = coloured(dog[None], ports)
    echo = coloured(cage(dog), lambda hz: gain_from_db(read(CAGE_ECHO, hz)))
    return direct + echo + rumble() + deep()


def roll_off(x):
    """The treble ends steeply here."""
    return signal.sosfilt(signal.butter(12, 12170, fs=SR, output="sos"), x)


def record(dry):
    """The microphone dips in the lower treble; a limiter turns both channels down around the loudest peaks."""
    dipped = coloured(dry, lambda hz: gain_from_db(-22 * np.exp(-((hz - 4650) / 260) ** 2)))
    size = int(HOLD_S * SR)
    room = np.minimum(CEILING / (abs(dipped).max(0) + 1e-9), 1)
    gain = minimum_filter1d(room, 2 * size + 1)
    gain = uniform_filter1d(uniform_filter1d(gain, size), size)
    return roll_off(dipped * gain)


dry = scene()
out = record(dry)
generate_wav(out)
```